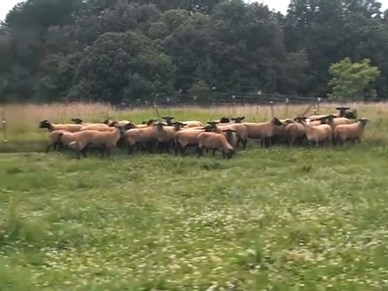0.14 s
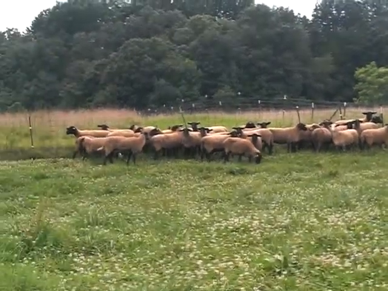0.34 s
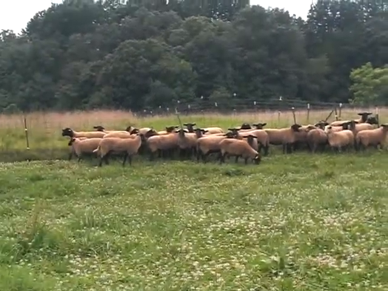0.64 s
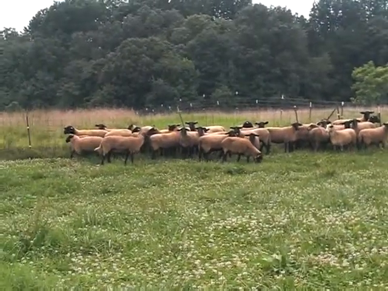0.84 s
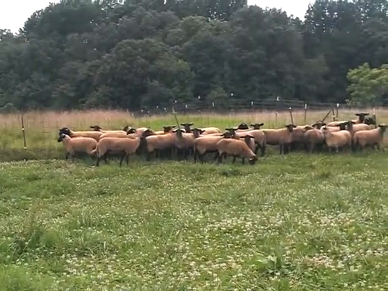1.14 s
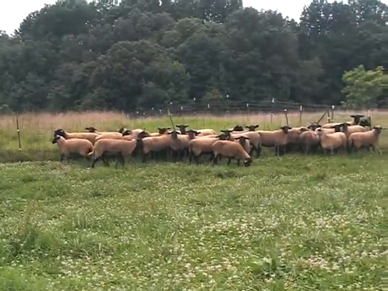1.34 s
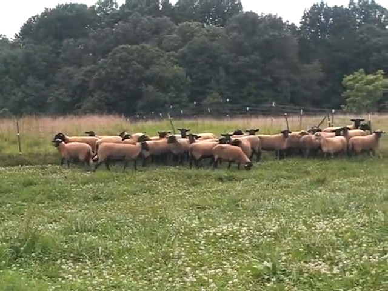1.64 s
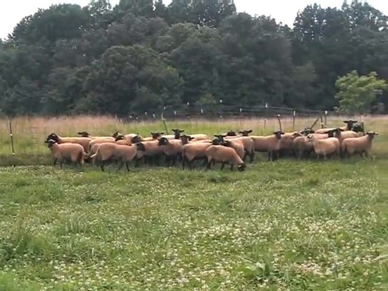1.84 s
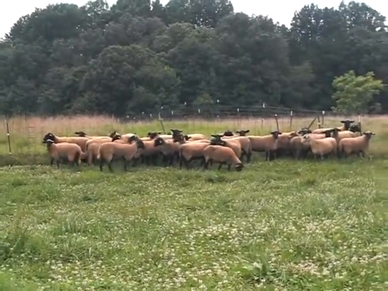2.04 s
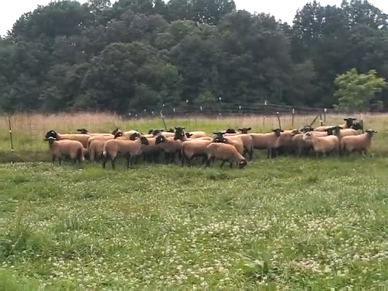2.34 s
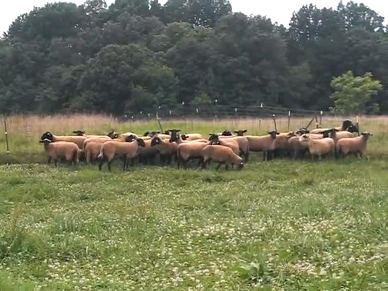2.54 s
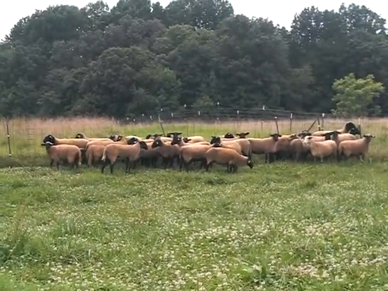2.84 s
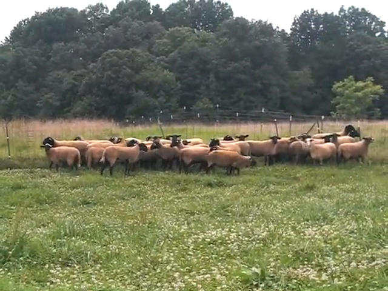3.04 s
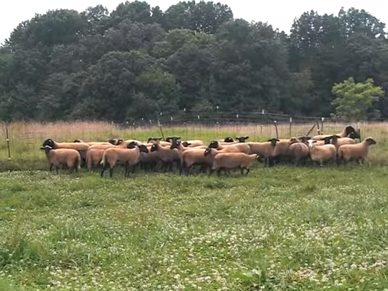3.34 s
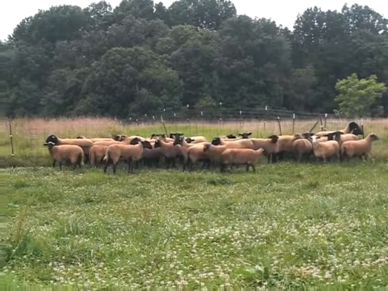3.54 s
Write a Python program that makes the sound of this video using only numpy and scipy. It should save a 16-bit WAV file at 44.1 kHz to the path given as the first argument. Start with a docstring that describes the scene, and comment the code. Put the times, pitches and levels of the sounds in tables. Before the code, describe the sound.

In an open meadow, insects chirp and a far lamb calls faintly before three sheep bleat in turn, quavering, full, then low. The single-channel sound has low rumble, light hiss and dulled extreme treble.

```python
"""Sheep in a summer meadow

Three near bleats in turn: pulses and breath noise through a moving throat filter, plus a low hum and echo.
Two lambs call far off as a few wavering overtones.
A cricket, a katydid and an insect with falling pulses sing as trains of short tones dropping in pitch.
Coloured noise gives the rumble, the hiss and a far insect chorus. Both channels are alike.
"""
import sys
import numpy as np
from scipy import signal
from scipy.fft import rfft, irfft
from scipy.io import wavfile
from scipy.ndimage import uniform_filter1d, map_coordinates

SR = 44100
rng = np.random.default_rng(int(sys.argv[2]) if len(sys.argv) > 2 else 0)


def field_ratio(decibels):
    """Amplitude ratio for a level in dB (20 dB per decade); scalars and array-likes work."""
    return 10 ** (np.asarray(decibels, dtype=float) / 20)


def output_pcm(signal):
    """Save a mono or channel-first signal as 16-bit PCM at the path in sys.argv[1].

    Samples are clipped to [-1, 1] before scaling.
    """
    pcm = np.clip(np.atleast_2d(signal).T, -1, 1) * 32767
    wavfile.write(sys.argv[1], SR, np.round(pcm).astype(np.int16))


N = 162288
T = np.arange(N) / SR


def rms_one(x):
    """Scales a signal to rms 1."""
    return x / np.sqrt(np.mean(x ** 2) + 1e-20)


def drift(rate_hz):
    """Random wander of rms 1: white noise through two equal one-pole lowpasses."""
    pole = np.exp(-2 * np.pi * rate_hz / SR)
    noise = rng.standard_normal(N + SR)
    return rms_one(signal.lfilter([1], [1, -2 * pole, pole * pole], noise)[SR:])


def at_hz(points, hz):
    """Reads a spectrum in dB, linear over log frequency."""
    point_hz, point_db = np.transpose(points)
    return np.interp(np.log(hz + 1), np.log(point_hz), point_db)


# Spectrum of rumble, hiss and far insect chorus: freq_hz, relative_density_db
MEADOW_SPECTRUM = [(24, -54), (40, -29), (60, -6), (97, 2), (164, 2), (257, -4.5), (593, -13.5),
                   (1130, -16.5), (1960, -19.5), (3730, -23.5), (5080, -23.5), (6930, -18.5), (8200, -12.5),
                   (9450, -6.5), (10500, -8.5), (12000, -10.5), (13000, -12.5)]


def meadow():
    """Coloured noise; the rumble wavers in level, the chorus at the top flickers faster."""
    level_db, rumble_spread_db, chorus_spread_db = -40, 1, 1.5
    rumble_below_hz, chorus_above_hz = 400, 6800
    hz = np.arange(N // 2 + 1) * SR / N
    coloured = rfft(rng.standard_normal(N)) * field_ratio(at_hz(MEADOW_SPECTRUM, hz))
    rumble = irfft(coloured * (hz < rumble_below_hz), N)
    chorus = irfft(coloured * (hz > chorus_above_hz), N)
    hiss = irfft(coloured, N) - rumble - chorus
    rumble = rumble * field_ratio(rumble_spread_db * drift(12))
    chorus = chorus * field_ratio(chorus_spread_db * drift(120))
    return field_ratio(level_db) * rms_one(hiss + rumble + chorus)


def lamb(rows, overtones):
    """Only a few thin, fluttering overtones of a far call arrive."""
    pitch_spread, flutter_db = 0.00405, 3  # spread as a share of the pitch
    s, hz, db = np.transpose(rows)
    pitch_hz = np.interp(T, s, hz) * (1 + pitch_spread * drift(19))
    phase = 2 * np.pi * np.cumsum(pitch_hz) / SR
    level_db = np.interp(T, s, db, left=-120, right=-120)
    out = np.zeros(N)
    for multiple, overtone_db in overtones:
        tone_db = level_db + overtone_db + flutter_db * drift(38)
        out += np.sqrt(2) * field_ratio(tone_db) * np.sin(round(multiple) * phase)
    return out


# Far call: time_s, pitch_hz, level_db
EARLY_CALL = [(0.0, 257.8, -59), (0.04, 262.5, -59), (0.066, 260.7, -65), (0.096, 258.2, -56),
              (0.152, 261, -64), (0.204, 260, -51), (0.23, 260, -57.5), (0.264, 261.7, -70),
              (0.342, 262.5, -52.5), (0.5, 260.2, -66), (0.518, 260, -56), (0.536, 260, -76),
              (0.574, 260, -52.5), (0.604, 262.7, -67), (0.73, 258.5, -60), (0.812, 260.4, -71),
              (0.828, 261.4, -60), (0.868, 254, -68.5), (0.92, 260, -56.5), (0.948, 260, -68),
              (0.97, 263.3, -60), (1.032, 261, -68), (1.044, 260.5, -82), (1.07, 260, -60),
              (1.116, 258.3, -59.5), (1.152, 259.6, -88), (1.182, 259, -59), (1.198, 260, -61),
              (1.224, 253, -72), (1.264, 260, -59), (1.31, 260, -80), (1.34, 258, -81)]
# Overtones that carry across the field: pitch_multiple, relative_db
EARLY_CARRIED = [(1, -11), (3, -15), (7, 1)]


def early_lamb():
    """First far call, as its carried overtones."""
    return lamb(EARLY_CALL, EARLY_CARRIED)


def strokes(centre_s, level_db, hz, drop_hz, length_s, spread_db):
    """Wing strokes: short swelling tones that fall in pitch, each varied a little."""
    u = np.arange(int(length_s * SR)) / (length_s * SR)
    swell = np.sin(np.pi * u) ** 1.02
    out = np.zeros(N + 2 * SR)  # 1 s spare at each end
    variation = rng.standard_normal((len(centre_s), 3))
    for s, db, (pitch, start_phase, level) in zip(centre_s, level_db, variation):
        i = int((s + 1 - length_s / 2) * SR)
        stroke_hz = hz * (1 + .004 * pitch) - drop_hz * u ** 3
        phase = 2 * np.pi * np.cumsum(stroke_hz) / SR + 9 * start_phase
        out[i:i + len(u)] += field_ratio(db + spread_db * level) * swell * np.sin(phase)
    return out[SR:SR + N]


def evenly(start_s, length_s, period_s):
    """Even times from start to end, spaced as near the period as fits."""
    return np.linspace(start_s, start_s + length_s, round(length_s / period_s) + 1)


# Long steady runs: first_pulse_s, last_pulse_s, period_s
PULSE_RUNS = [(.016, 2.0, .05835), (2.429, 3.645, .0579)]


def falling_insect():
    """Steady pulses, each a tone sliding down 1190 Hz."""
    times_s = np.concatenate([evenly(a, b - a, period) for a, b, period in PULSE_RUNS])
    level_db = -41.5 + 0 * times_s
    return strokes(times_s, level_db, hz=8820, drop_hz=1190, length_s=.022, spread_db=0.3)


# Chirps: first_stroke_s, time_to_last_stroke_s
CRICKET_CHIRPS = [(.016, .064), (0.098, 0.1), (0.231, 0.071), (0.308, .016), (1.852, 0.02), (1.92, 0.048),
                  (2.019, 0.058), (2.092, 0.031), (2.144, 0.052), (2.258, 0.036), (2.333, 0.088),
                  (2.444, 0.057), (2.534, .075), (2.641, .016)]


def cricket():
    """Grouped chirps of lower-pitched wing strokes."""
    times_s = np.concatenate([evenly(s, length, .0154) for s, length in CRICKET_CHIRPS])
    level_db = -55.5 + 0 * times_s
    return strokes(times_s, level_db, hz=4770, drop_hz=450, length_s=.011, spread_db=1.0)


# Chirps: first_full_stroke_s, time_to_last_stroke_s
KATYDID_CHIRPS = [(0.0753, 0.013), (0.1935, 0.0206), (0.3327, 0.0077), (0.4428, 0.0067), (0.5336, 0.016),
                  (0.6429, 0.0156), (0.7527, 0.0127), (0.8567, 0.0131), (0.9606, 0.016), (1.062, 0.0132),
                  (1.1666, 0.0154), (1.269, 0.0156), (1.3775, 0.0134), (1.497, 0.0207), (1.6184, 0.013),
                  (1.734, 0.02), (1.8417, 0.0216), (1.9566, 0.017), (2.0697, 0.02), (2.1822, 0.0207),
                  (2.3004, 0.022), (2.4049, 0.023), (2.5093, 0.0207), (2.6165, 0.022), (2.7618, 0.014),
                  (2.8753, 0.016), (2.9876, 0.023), (3.1103, 0.0196), (3.2302, 0.0274), (3.3626, 0.0277),
                  (3.5792, 0.0284)]


def katydid():
    """Chirps of high wing strokes, each chirp led by one softer stroke."""
    period_s, full_db, lead_relative_db = .0069, -32, -6.5
    full_s = np.concatenate([evenly(s, length, period_s) for s, length in KATYDID_CHIRPS])
    lead_s = np.array([s - period_s for s, _ in KATYDID_CHIRPS])
    level_db = full_db + np.r_[0 * full_s, lead_relative_db + 0 * lead_s]
    return strokes(np.r_[full_s, lead_s], level_db, hz=9742, drop_hz=700, length_s=.006, spread_db=0.63)


def throat(source, points):
    """Causal minimum-phase filter with this spectrum; rms 1 in the mouth band."""
    log_gain = at_hz(points, np.linspace(0, SR / 2, 2049)) * np.log(10) / 20
    cepstrum = irfft(log_gain)
    cepstrum[1:2048] *= 2  # fold onto positive time
    cepstrum[2049:] = 0
    impulse = irfft(np.exp(rfft(cepstrum)))[:2048]
    out = signal.fftconvolve(source, impulse)[:len(source)]
    mouth_band = signal.butter(4, [1100, 3500], "band", fs=SR, output="sos")
    return out / np.std(signal.sosfilt(mouth_band, out))


def bleat(rows, hum, throats, stretch, follows, opens_s, jitter, breath):
    """Pulses and breath puffs through an opening mouth, plus a separate low hum.

    The throat runs on a clock sped up or slowed by the stretch, which shifts its resonances.
    follows: exponent by which they also track quick pitch changes; jitter: pitch spread as a share.
    """
    s, hz, mouth_db = np.transpose(rows)
    span = (T >= s[0]) & (T <= s[-1])
    t = T[span]
    pitch_hz = np.interp(t, s, hz)
    phase = 2 * np.pi * np.cumsum(pitch_hz * (1 + jitter * drift(62.5)[span])) / SR

    quick_pitch = (pitch_hz / uniform_filter1d(pitch_hz, size=6000)) ** follows
    clock = np.cumsum(np.interp(t, *np.transpose(stretch)) * quick_pitch)
    warped_phase = np.interp(np.arange(clock[-1] + 1), clock, phase)

    warped_t = np.interp(warped_phase, phase, t)
    breath_share = np.interp(warped_t, *np.transpose(breath))
    noise = rng.standard_normal(N)[:len(warped_phase)]
    puffs = breath_share * (1.9 + 0.56 * np.cos(warped_phase)) * noise
    pulses = rms_one(sum(np.cos(k * warped_phase) for k in range(2, 45)))
    source = pulses + puffs

    # Reading on the clock restores the pitch and shifts the resonances
    shut, wide = (map_coordinates(throat(source, shape), [clock], order=3, mode="nearest")
                  for shape in throats)
    opened = np.clip((t - opens_s) / 0.0067 + .5, 0, 1)
    voice = field_ratio(np.interp(t, s, mouth_db)) * ((1 - opened) * shut + opened * wide)

    hum_rows, overtone_db = hum
    low = np.sin(phase) + sum(field_ratio(db) * np.sin(k * phase) for k, db in zip((2, 3), overtone_db))
    voice += np.sqrt(2) * field_ratio(np.interp(t, *np.transpose(hum_rows))) * low
    edges = np.clip(np.minimum(t - s[0], s[-1] + 0.012 - t) / 0.013, 0, 1)
    out = np.zeros(N)
    out[span] = voice * edges
    return out


# Mouth sound: time_s, pitch_hz, level_db
QUAVER_VOICE = [(1.39, 169, -78), (1.448, 177, -52), (1.472, 161.7, -57), (1.484, 166.8, -69),
                (1.506, 167.5, -59), (1.532, 173.2, -60), (1.556, 180.9, -46), (1.57, 183.1, -62),
                (1.59, 177.1, -35.5), (1.604, 181.1, -48), (1.622, 184.5, -42), (1.65, 185.9, -45.5),
                (1.662, 187.7, -32.5), (1.674, 180.6, -37), (1.69, 184.6, -50), (1.712, 196.7, -33.5),
                (1.73, 206.7, -32.5), (1.746, 206.5, -36), (1.764, 205.8, -44), (1.78, 196.8, -57),
                (1.792, 192.2, -34), (1.81, 201.4, -45.5), (1.834, 198.2, -37), (1.848, 194.6, -36.5),
                (1.874, 208.9, -36.5), (1.9, 199.9, -48.5), (1.92, 206.8, -35), (1.94, 210.4, -43.5),
                (1.96, 203.4, -41), (1.982, 213.2, -38.5), (2.002, 212.4, -43.5), (2.022, 198.8, -53),
                (2.038, 204.2, -39.5), (2.062, 194.6, -45), (2.078, 203.5, -40), (2.116, 207.2, -45),
                (2.138, 213.5, -47.5), (2.162, 200, -54), (2.186, 204.2, -42), (2.26, 207.2, -74)]
# Nose and chest hum: (time_s, level_db), then relative_db of overtones 2 and 3
QUAVER_HUM = [(1.39, -66), (1.418, -46), (1.57, -50), (1.628, -66), (1.678, -46), (1.748, -56),
              (1.896, -44), (2.208, -42), (2.252, -69), (2.26, -62)], (-15, -24)
# Throat before and after the mouth opens, unstretched: freq_hz, gain_db
QUAVER_THROAT = ([(410, -36), (700, -6), (1000, -14.5), (1300, 0.5), (1550, -11), (1850, 5.5), (2050, 2),
                 (2280, 11.5), (2500, 2.5), (2750, 1), (3000, 3.5), (3400, -10), (4110, -17.5), (5060, -19),
                 (6000, -34), (7800, -52)], [(410, -33), (700, -2), (957, -12.5), (1340, 9.5), (1650, -10),
                 (1880, 8.5), (2050, -4), (2300, 16), (2500, 10), (2700, -1), (2950, 14.5), (3200, 0),
                 (3450, -3), (4500, -13), (6500, -42)])
# Throat length change: time_s, resonance_factor
QUAVER_STRETCH = [(1.399, .97), (1.601, 1.044), (1.751, 0.99), (1.85, 1.03), (1.999, 1.01), (2.12, 0.98),
                  (2.25, 1.02)]
# Hoarseness: time_s, relative_noise_share
QUAVER_BREATH = [(1.4, 1.2), (1.55, .9), (1.65, .5), (1.8, .35), (2.25, .25)]


def quavering_bleat():
    """Hoarse bleat of unsteady pitch; its resonances follow the quaver."""
    return bleat(QUAVER_VOICE, QUAVER_HUM, QUAVER_THROAT, QUAVER_STRETCH,
                 follows=.7, opens_s=1.93, jitter=.01, breath=QUAVER_BREATH)


# Mouth sound: time_s, pitch_hz, level_db
FULL_VOICE = [(2.3, 253.6, -65), (2.306, 257.7, -75), (2.336, 248.5, -54), (2.356, 209.4, -48.5),
              (2.382, 168.6, -38.5), (2.386, 163.2, -37.5), (2.45, 174.1, -38.5), (2.514, 179.5, -41),
              (2.578, 180.1, -43), (2.594, 175.6, -47), (2.63, 182, -34.5), (2.654, 178.2, -40),
              (2.688, 185.8, -35), (2.71, 188.5, -31), (2.736, 183.1, -33.5), (2.798, 187.5, -30.5),
              (2.904, 184.9, -32.5), (3.092, 176.9, -38), (3.136, 174.3, -44.5), (3.2, 168.5, -58)]
# Nose and chest hum: (time_s, level_db), then relative_db of overtones 2 and 3
FULL_LOW_HUM = [(2.3, -66), (2.326, -43.5), (2.346, -38.5), (2.602, -35.5), (2.628, -41.5), (3.026, -43),
                (3.048, -50), (3.154, -46.5), (3.2, -43.5)], (-22.5, -20.5)
# Throat before and after the mouth opens, unstretched: freq_hz, gain_db
FULL_RESONANCES = ([(410, -34), (700, -14), (950, -8), (1150, 6), (1400, -4), (1750, 6), (2100, 9),
                   (2400, 8.5), (2750, 12), (3100, -12), (3670, -13), (4400, -42), (5200, -5), (6000, -18),
                   (7000, -31), (9100, -69)], [(210, -34), (370, -4.5), (564, -3.5), (800, -19),
                   (1050, -16), (1290, -1), (1480, 8.5), (1720, -5), (1950, -6.5), (2270, 4.5),
                   (2440, 12.5), (2620, -1), (2820, -2), (3000, -8.5), (3200, -4.5), (3450, -31),
                   (3780, -11), (4240, -24.5), (4800, -11.5), (5300, -13.5), (5800, -20.5), (6250, -15),
                   (7000, -34), (9100, -68)])
# Throat length change: time_s, resonance_factor
FULL_LENGTH = [(2.35, .94), (2.5, .99), (2.58, 1.03), (2.611, 0.93), (2.7, .97), (2.8, 0.98), (3.0, 1),
               (3.151, 0.96)]
# Hoarseness: time_s, relative_noise_share
FULL_NOISE = [(2.32, .5), (2.4, .15), (2.6, .08), (2.75, .03), (3.2, .06)]


def full_bleat():
    """Clearer bleat with steady pulses and little breath noise."""
    return bleat(FULL_VOICE, FULL_LOW_HUM, FULL_RESONANCES, FULL_LENGTH,
                 follows=0, opens_s=2.6, jitter=.0015, breath=FULL_NOISE)


# Far call: time_s, pitch_hz, level_db
LATE_CALL = [(2.4, 260, -60), (2.48, 267, -49.5), (2.65, 267.2, -49.5), (2.85, 271, -48.5),
             (3.05, 267, -52), (3.15, 261, -49), (3.22, 257.6, -43.5), (3.25, 258, -51), (3.3, 258, -48.5),
             (3.36, 258.3, -57), (3.49, 257, -48), (3.53, 260, -68)]
# Overtones that carry across the field: pitch_multiple, relative_db
LATE_CARRIED = [(3, -11.5), (6, -5)]


def late_lamb():
    """Second far call, as its carried overtones."""
    return lamb(LATE_CALL, LATE_CARRIED)


# Mouth sound: time_s, pitch_hz, level_db
DEEP_VOICE = [(3.13, 106.6, -43.5), (3.186, 114.8, -48.5), (3.25, 123.6, -54), (3.282, 128.1, -57),
              (3.342, 131.5, -59), (3.428, 132, -54), (3.448, 133.2, -59), (3.516, 131.6, -50.5),
              (3.528, 130.4, -59), (3.552, 128, -36.5), (3.576, 130, -37.5), (3.604, 120.3, -40),
              (3.616, 121.3, -41.5), (3.644, 129.0, -38), (3.68, 130.2, -37.5)]
# Nose and chest hum: (time_s, level_db), then relative_db of overtones 2 and 3
DEEP_LOW_HUM = [(3.13, -39), (3.168, -47), (3.508, -43), (3.536, -49), (3.552, -66), (3.61, -51),
                (3.68, -52)], (-7, -17.5)
# Throat before and after the mouth opens, unstretched: freq_hz, gain_db
DEEP_RESONANCES = ([(300, -33), (700, -9), (1300, -2.5), (1650, -2.5), (1950, 5), (2250, -8), (2600, -8),
                   (3500, -15.5), (6000, -52)], [(130, -44), (260, 10.5), (381, 8.5), (642, -1.5),
                   (800, -4.5), (1200, 4.5), (1600, 2), (1930, 13.5), (2120, 2), (2330, 17.5), (2600, -2),
                   (2810, 0), (3200, -2.5), (3700, -8.5), (4270, -22), (5000, -18), (6500, -48)])
# Throat length change: time_s, resonance_factor
DEEP_LENGTH = [(3.14, 0.99), (3.25, 1.05), (3.448, 1.12), (3.53, 1.04), (3.62, .98), (3.68, 1.01)]
# Hoarseness: time_s, relative_noise_share
DEEP_NOISE = [(3.13, .1), (3.3, .3), (3.55, .3), (3.6, .4), (3.625, .7), (3.65, .3)]


def deep_bleat():
    """Low-pitched bleat that grows louder as the mouth opens."""
    return bleat(DEEP_VOICE, DEEP_LOW_HUM, DEEP_RESONANCES, DEEP_LENGTH,
                 follows=0, opens_s=3.53, jitter=.005, breath=DEEP_NOISE)


def echo(x):
    """Adds a short diffuse echo: decaying noise as the impulse response."""
    level_db, t60_s, length = -17, .12, 8000
    decay = field_ratio(-60 * np.arange(length) / SR / t60_s)
    tail = rms_one(rng.standard_normal(length) * decay) / np.sqrt(length)  # unit energy
    return x + field_ratio(level_db) * signal.fftconvolve(x, tail)[:N]


def scene():
    """Sums all sources into two equal channels."""
    flock = echo(quavering_bleat() + full_bleat() + deep_bleat())
    lambs = early_lamb() + late_lamb()
    insects = falling_insect() + cricket() + katydid()
    mono = meadow() + lambs + insects + flock
    return np.array([mono, mono])


def band_limit(x):
    """A steep low-pass at the top of the band."""
    return signal.sosfilt(signal.butter(12, 13210, fs=SR, output="sos"), x)


def record(dry):
    """A narrow notch at 7740 Hz and a very steep treble cut at 12040 Hz."""
    notched = signal.lfilter(*signal.iirnotch(7740, 90, fs=SR), dry)
    treble_cut = signal.ellip(14, .2, 75, 12040, fs=SR, output="sos")
    mix = signal.sosfilt(treble_cut, notched)
    return band_limit(mix)


dry = scene()
out = record(dry)
output_pcm(out)
```